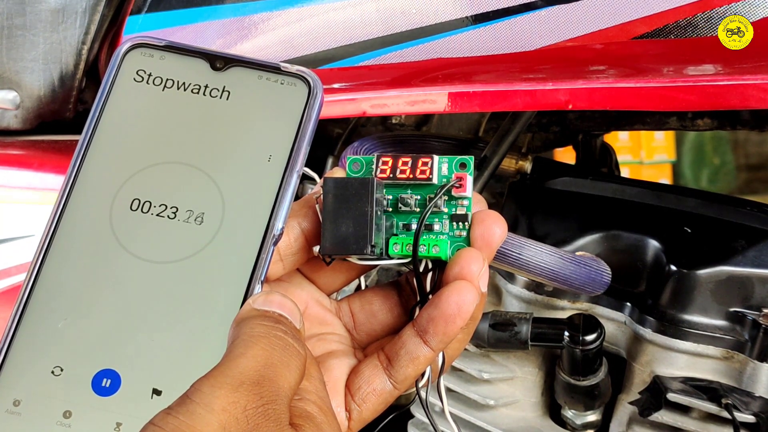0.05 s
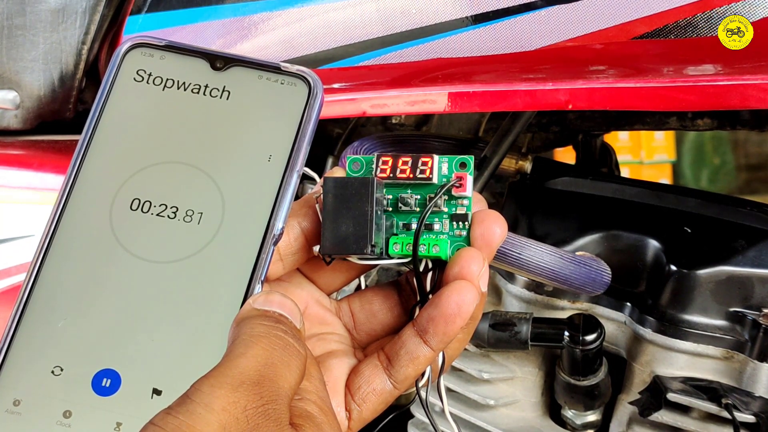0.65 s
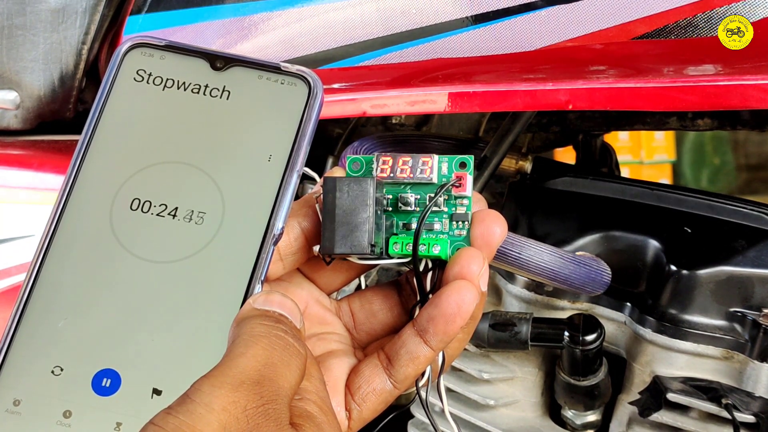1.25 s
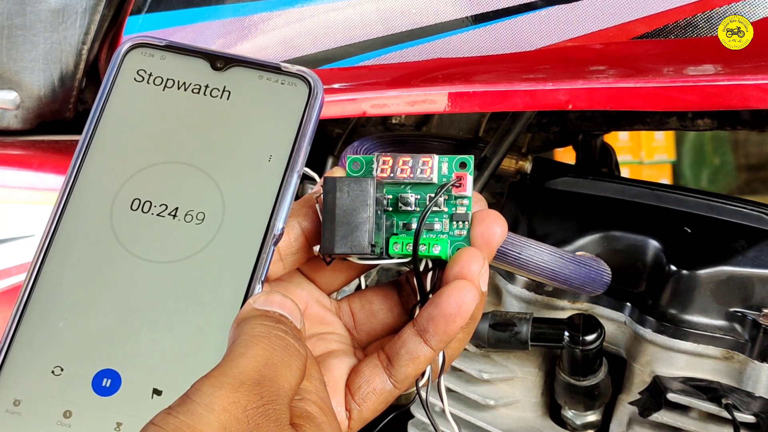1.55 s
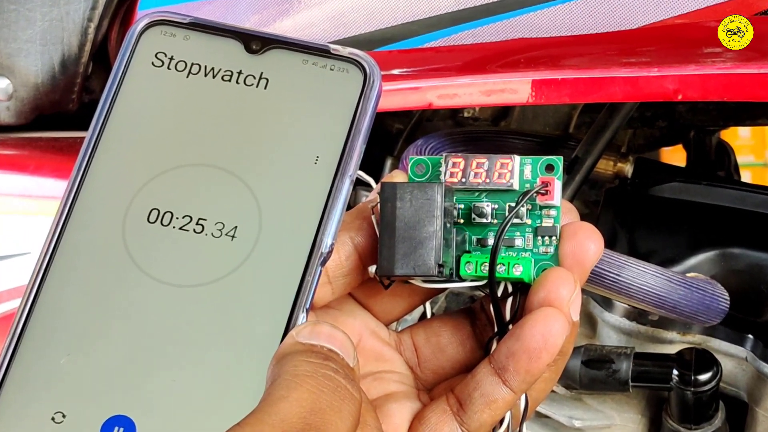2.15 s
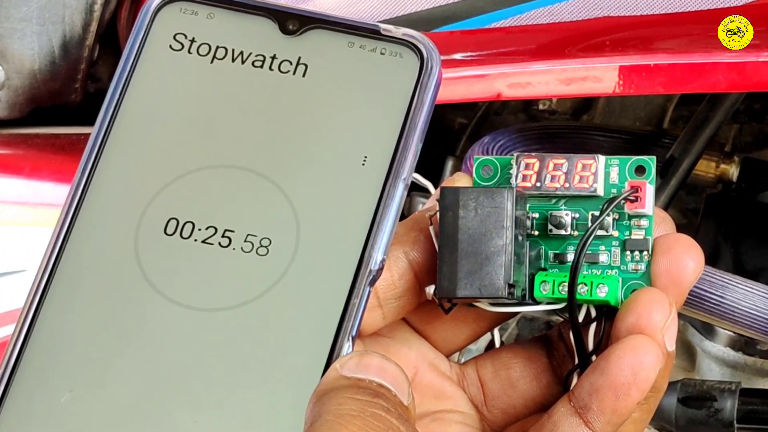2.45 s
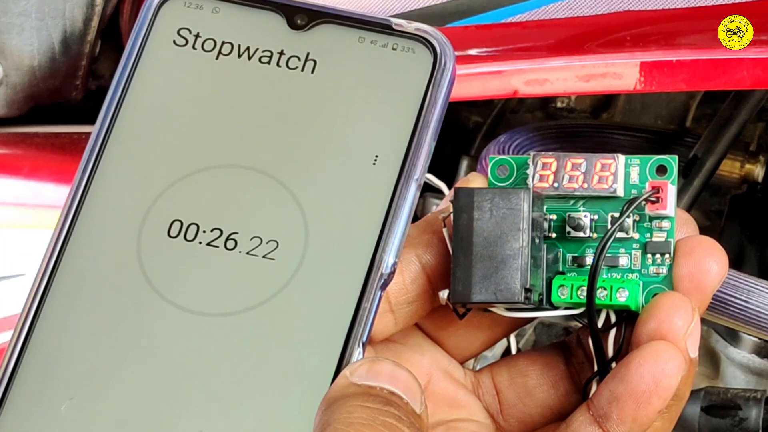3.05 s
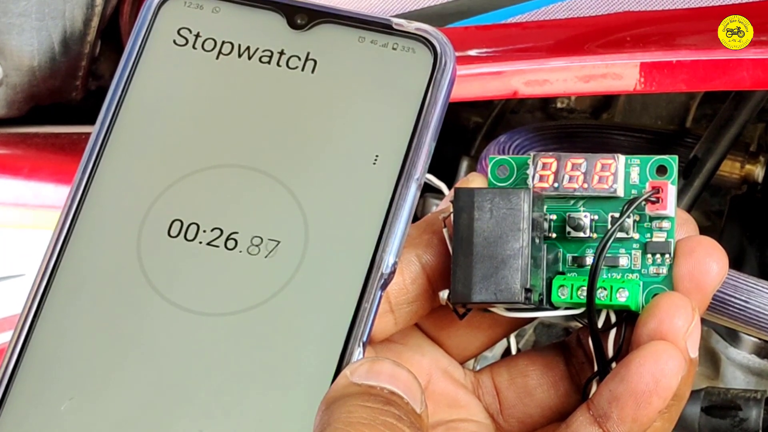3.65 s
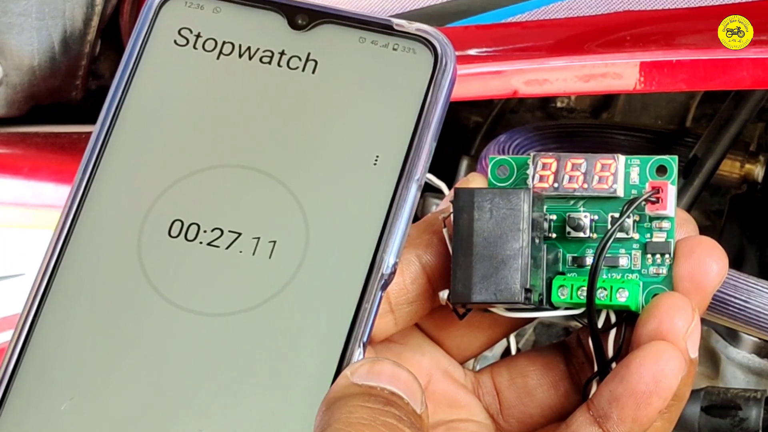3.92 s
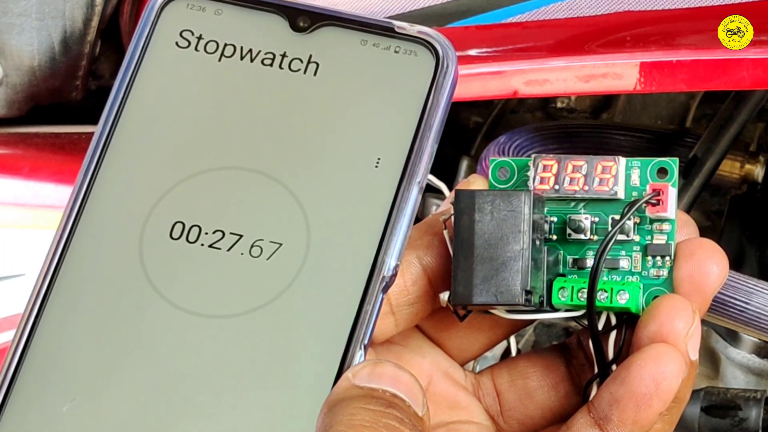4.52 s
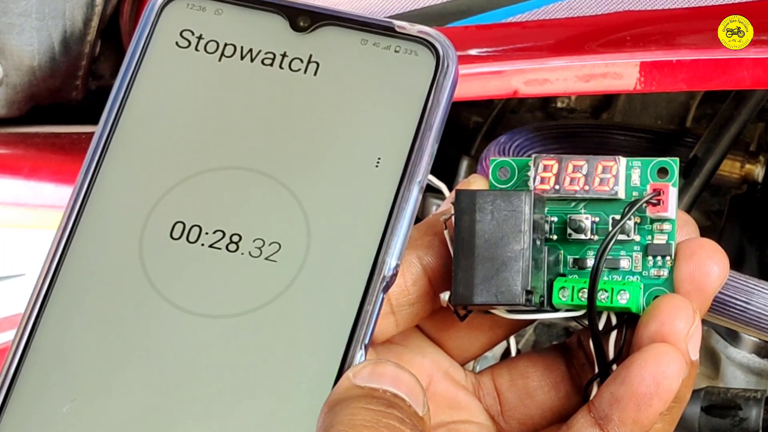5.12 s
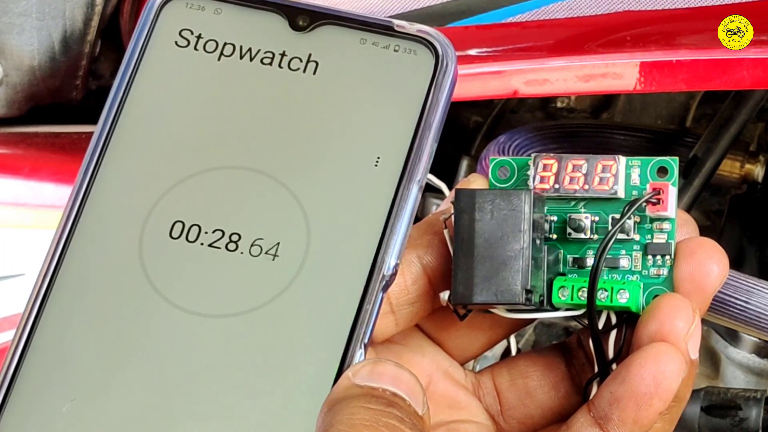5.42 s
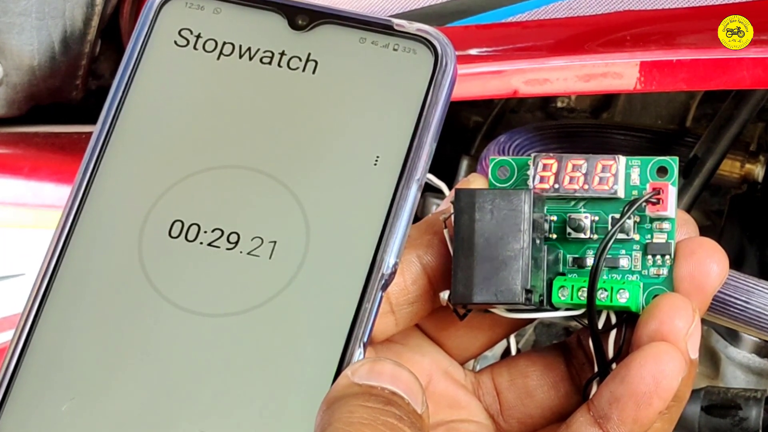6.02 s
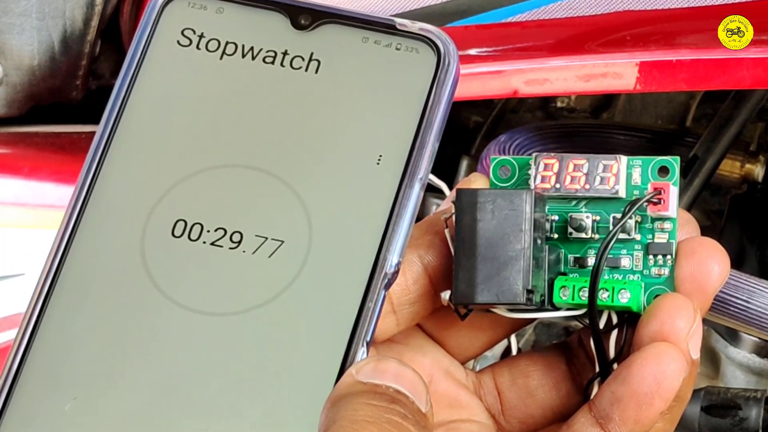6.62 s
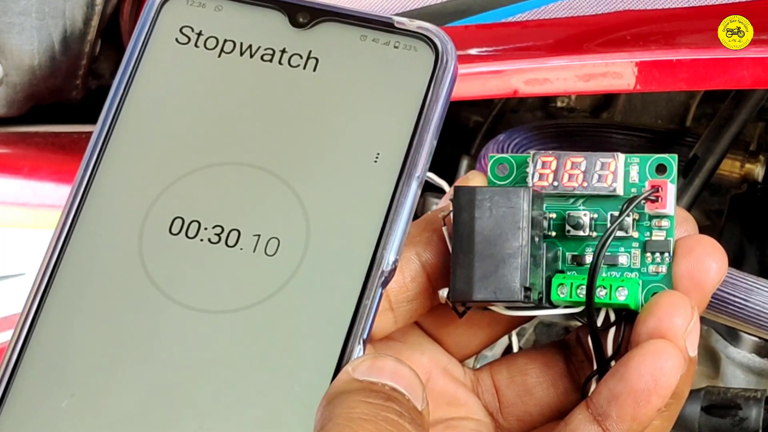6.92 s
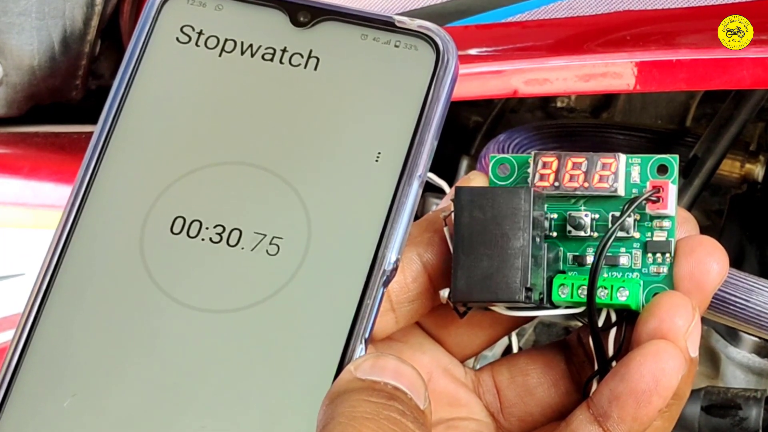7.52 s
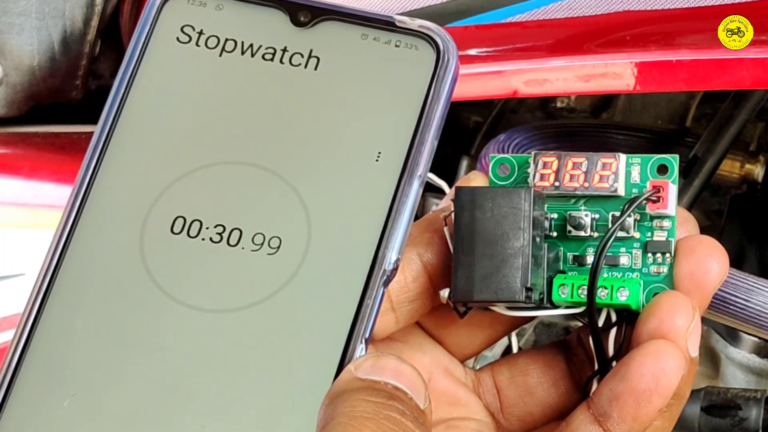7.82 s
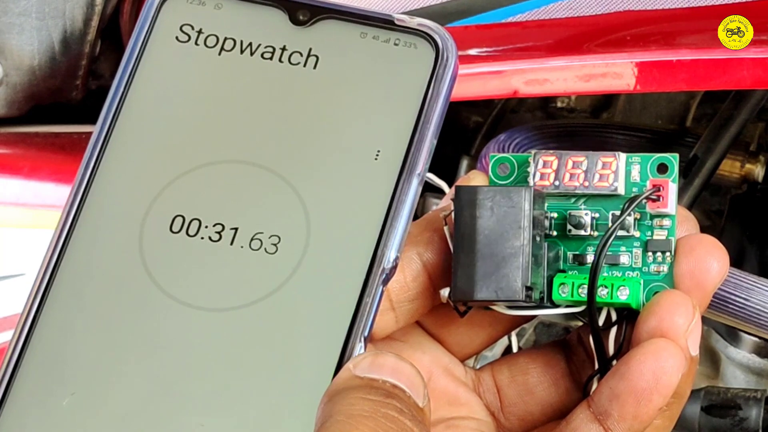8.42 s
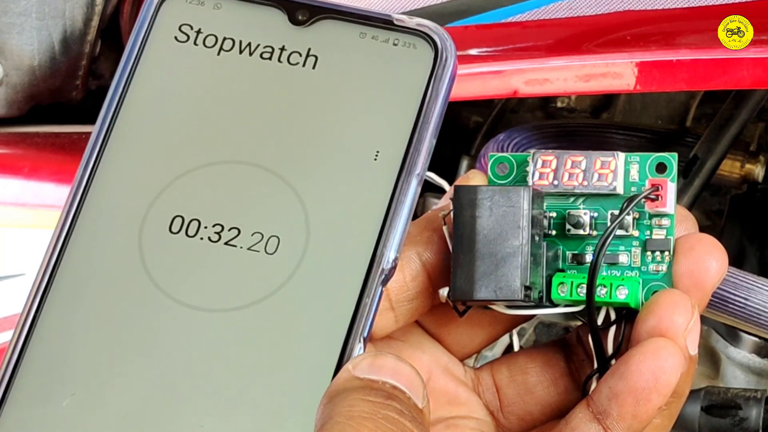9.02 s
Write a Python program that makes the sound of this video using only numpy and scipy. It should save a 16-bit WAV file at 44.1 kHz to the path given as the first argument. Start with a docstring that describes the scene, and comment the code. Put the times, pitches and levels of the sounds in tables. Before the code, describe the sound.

Heard close up in a workshop, a single-cylinder motorcycle engine putters at idle throughout, its speed wandering a little. Valves tick and clink, the metal casing knocks, and chain and gears whirr underneath. In the first three seconds a soft hollow hoot repeats over a faint hum, then both die away. Brief dry rasps crop up irregularly, and the ticking grows slightly stronger near the end.

```python
"""In a workshop, a small air-cooled four-stroke engine idles, heard from beside its one cylinder.
In each cycle, gas thumps out through the pipe, air is gulped in, knocks ring the metal casing and the
valve parts tick, over the whirr of chain and gears. The speed wanders a little, and the thumps are
harder when it is faster. Some cycles add a short dry rasp.
Early on, a soft hollow hoot comes and goes over a faint hum."""
import sys
import numpy as np
from scipy import signal
from scipy.fft import rfft, irfft
from scipy.io import wavfile

SR = 44100
rng = np.random.default_rng(int(sys.argv[2]) if len(sys.argv) > 2 else 0)


def put_to_file(sound):
    """Save the sound as 16-bit audio at rate SR, in the file named by the first command-line argument."""
    columns = np.atleast_2d(sound).T  # one column per channel
    safe = np.clip(columns, -1, 1)
    whole_steps = np.round(safe * 32767)
    wavfile.write(sys.argv[1], SR, whole_steps.astype(np.int16))


N = 408366
TIME = np.arange(N) / SR
HOOT_HZ = 315.8   # pitch of both the hoots and the hum


def exhaust(cycle, burn_db, exhaust_at=-.052, intake_at=.567, valve_hz=350):
    """A push of gas going out and a pull of air coming in make the pipe and silencer ring."""
    # tones of the pipe and silencer: f/Hz, width/Hz, level/dB
    pipe_modes = [(73.7, 25.2, -17.5), (108.4, 13.8, -18.5), (155.4, 80.6, -2), (156.8, 116.8, 0.5)]
    # bark as the exhaust opens, then thud of the silencer shell: place/cycles, f/Hz, width/Hz
    bark_modes = [(.002, 232, 48), (.1, 391, 50)]
    # strength of that bark and that thud: level/dB
    bark_levels = [-24.5, -27]
    push = strikes(cycle, [(exhaust_at, 0)], scatter_db=.37, jitter_s=.0001)
    pull = strikes(cycle, [(intake_at, -6)], scatter_db=.3, jitter_s=.0007)
    # the valves open gradually, which rounds each pulse
    flow = signal.sosfilt(signal.butter(2, valve_hz, fs=SR, output="sos"), push - pull)
    flow *= from_db(burn_db + 3.5)
    pipe = sum((-1) ** k * from_db(db) * ring(flow, hz, width)
               for k, (hz, width, db) in enumerate(pipe_modes))
    barks = sum(ring(strikes(cycle, [(place, db)], scatter_db=1.3, jitter_s=.0001), hz, width)
                for (place, hz, width), db in zip(bark_modes, bark_levels))
    # the small outlet gives off no deep bass
    return signal.sosfilt(signal.butter(4, 62, "high", fs=SR, output="sos"), pipe + barks)


def casing(cycle):
    """Knocks ring the metal casing and loose parts rattle after them; it gives off no deep bass."""
    # piston and cam knocks: place/cycles, level/dB
    contacts = [(-.152, 2), (-.09, -7), (-.054, -.4), (.034, -.2), (.145, -3.7), (.233, -3.8), (.296, -4.4),
                (.361, -8.3), (.459, -4.3), (.599, -8)]
    # tones of the casing: f/Hz, width/Hz, level/dB
    modes = [(220, 97, 1), (292, 9.1, -5), (392.8, 12.3, 9), (426.8, 7.7, 8.5), (511.5, 5, -1),
             (657.4, 10.4, 7.5), (695, 9.7, 5.5), (770, 24, 3), (835, 21, 2.5), (1009, 104, -6.5),
             (1041, 11.5, -3.6), (1233, 43, -7), (1386, 47, -8)]
    knocks = strikes(cycle, contacts, scatter_db=1.35, jitter_s=.00008)
    rattle = chatter(knocks, decay_s=.0039)
    metal = from_db(-33) * (body(knocks, modes) + .31 * body(rattle, modes))
    return signal.sosfilt(signal.butter(2, 60, "high", fs=SR, output="sos"), metal)


def tappets(cycle):
    """Tappets, the small parts that push the valves open, tap and set the valve cover ringing."""
    # the taps: place/cycles, level/dB
    taps = [(-.006, 0), (.036, -4), (.16, -5.5), (.2, -9), (.32, -13)]
    # tones of the cover: f/Hz, width/Hz, level/dB
    modes = [(2375, 65, -1.5), (2437, 89, 4), (2800, 63, 3), (3520, 220, -11), (5490, 100, -8.5)]
    # slow drift of the clatter: t/s, level/dB
    drift = [(0, 0.5), (3.7, 1), (4.4, 1.5), (5.9, 2), (6.9, 4.5), (8.1, 3.5), (8.7, 2), (9.26, 3)]
    # cycles where the tappets land hard: t/s, extra level/dB
    hard_taps = [(.9, 1.5), (1.8, 2.5), (2.1, 2), (3.15, 6.5), (5.27, 5), (6.85, 2.5), (7.6, 2), (8.0, 2)]
    clatter_db = in_time(drift) + each_cycle(cycle, spread_db=1.5)
    for s, extra_db in hard_taps:
        clatter_db[np.round(cycle) == np.round(np.interp(s, TIME, cycle))] += extra_db
    # no two taps land alike, so each tone gets strikes of its own
    cover = sum(from_db(db) * width * ring(strikes(cycle, taps, scatter_db=3, jitter_s=.00022), hz, width)
                for hz, width, db in modes)
    return from_db(clatter_db - 52.5) * cover / cover.std()


def clinks(cycle):
    """Steel meets steel, ringing the valve springs and the rockers (the levers that work the valves)."""
    # the steel contacts: place/cycles, level/dB
    contacts = [(-.02, 0), (.002, -1), (.026, -1.5), (.052, -4), (.165, -8), (.21, -10), (.26, -8),
                (.593, -8), (.745, -11)]
    # tones of the springs and rockers: f/Hz, width/Hz, level/dB
    modes = [(6150, 71, -9), (6650, 71, -3), (6995, 57, 2.5), (7330, 99, 1), (7380, 170, -3),
             (8110, 340, -13.5), (9970, 1000, -21), (11150, 49, -11), (12000, 200, -29)]
    clicks = strikes(cycle, contacts, scatter_db=.5, jitter_s=.000098)
    return from_db(-53.5) * body(chatter(clicks, decay_s=.0033), modes)


def bright_ticks(cycle, facing_db):
    """The valve parts also tick very high, loudest about a third of a cycle after the main tap."""
    # the ticks: place/cycles, level/dB
    contacts = [(.155, -5), (.2, -6), (.255, -4), (.287, 1), (.335, -7), (.53, -9), (.675, -9)]
    # tones they ring with: f/Hz, width/Hz, level/dB
    modes = [(9100, 200, -4), (9560, 130, 3), (11100, 70, -1.5), (11900, 120, -3.5), (13380, 70, -5.5),
             (14250, 220, -6)]
    clicks = strikes(cycle, contacts, scatter_db=2.2, jitter_s=.0004)
    ticks = body(chatter(clicks, decay_s=.002), modes)
    return from_db(facing_db + each_cycle(cycle, spread_db=1.6) - 65.5) * ticks


def rasp(cycle, speed, start_at=.76, rise_s=.0035, decay_s=.025):
    """A dry scrape comes just before the tappets, faint on most cycles and loud on a few."""
    # the loud rasps: t/s, level/dB
    loud_rasps = [(0.41, -47), (0.75, -44), (2.19, -43), (2.73, -45), (3.13, -45), (3.54, -46), (3.95, -47),
                  (5.8, -45), (5.87, -47), (6.63, -45), (7.44, -49), (7.58, -44), (8.39, -44)]
    # tone colour of the scrape: f/Hz, level/dB
    colour = [(1500, -27), (2500, -1), (3600, 10.5), (5500, 9), (7000, -1), (9000, -28), (15000, -42)]
    rasp_cycle = cycle - start_at
    db = each_cycle(rasp_cycle - .5, spread_db=1) - 54
    for s, loud_db in loud_rasps:
        db[np.floor(rasp_cycle) == np.round(np.interp(s, TIME, rasp_cycle))] = loud_db
    age = rasp_cycle % 1 / speed
    rise = np.minimum(age / rise_s, 1)
    fade = np.exp(-np.maximum(age - 2 * rise_s, 0) / decay_s)
    return from_db(db) * rise * fade * noise(colour)


def whirr(cycle):
    """Chain and gears run on, louder and softer as the load changes through each cycle."""
    # tone colour of chain, gears and cooling fins: f/Hz, level/dB
    colour = [(25, -35), (60, 3), (130, 3), (300, 5.5), (550, 0.5), (800, 2), (1300, -7), (1900, -14.5),
              (3000, -16.5), (5600, -22), (7100, -19), (8600, -30.5), (12000, -36.5), (15500, -38)]
    # swell with the load: place/cycles, level/dB
    load = [(0, 4), (.3, 6.5), (.5, 5.5), (.7, 3), (.85, 7.5)]
    place, db = np.transpose(load)
    return from_db(np.interp(cycle, place, db, period=1) - 37.5) * noise(colour)


def hoots(length_s=.15, sag_hz_per_s=50):
    """Soft, nearly pure notes swell and fade, each sinking a little in pitch."""
    # the middle of each hoot: t/s, level/dB
    notes = [(1.199, -37), (1.924, -32.5), (2.162, -28), (2.353, -28.5), (2.575, -33), (2.809, -36)]
    out = np.zeros(N)
    for s, db in notes:
        near = np.abs(TIME - s) < length_s / 2
        offset_s = TIME[near] - s
        swell = np.cos(np.pi * offset_s / length_s)
        tone = np.sin(2 * np.pi * (HOOT_HZ - sag_hz_per_s * offset_s / 2) * offset_s)
        out[near] += from_db(db) * np.sqrt(2) * swell * tone
    return out


def hum(width_hz=43):
    """A faint hum wavers at the pitch of the hoots and all but dies away after them."""
    # loudness of the hum: t/s, level/dB
    levels = [(0, -45), (.6, -41), (1.6, -37.5), (2.6, -39), (3.6, -56), (9.26, -56)]
    x = ring(ring(rng.standard_normal(N), HOOT_HZ, width_hz), HOOT_HZ, width_hz)
    return from_db(in_time(levels)) * x / x.std()


def workshop(x, echo_s=.2, echo_db=-13):
    """Adds short, dense echoes from tank, floor and walls; they fade by 60 dB in echo_s."""
    age = TIME[:SR // 2]
    echoes = rng.standard_normal(len(age)) * from_db(-60 * age / echo_s) * (age > .003)
    return x + from_db(echo_db) * signal.fftconvolve(x, echoes / np.linalg.norm(echoes))[:N]


def strikes(cycle, contacts, scatter_db, jitter_s):
    """One click per contact in every cycle, uneven in force and, as the parts are loose, in timing."""
    out, cycle_numbers = np.zeros(N), np.arange(-1, cycle[-1] + 1)
    for place, db in contacts:
        force, late = rng.standard_normal((2, len(cycle_numbers)))
        due_s = np.interp(cycle_numbers + place, cycle, TIME, left=-1, right=-1)
        at = np.round((due_s + jitter_s * late) * SR).astype(int)
        heard = (at >= 0) & (at < N)
        out[at[heard]] += from_db(db + scatter_db * force[heard])
    return out


def chatter(clicks, decay_s):
    """Each click breaks up into a quickly dying spray of tiny ones."""
    energy = signal.lfilter([1], [1, -np.exp(-2 / (decay_s * SR))], clicks ** 2 + 1e-18)
    return np.sqrt(energy) * rng.standard_normal(N)


def ring(drive, hz, width_hz):
    """One ringing tone (a mode): a click starts it, and the wider it is, the sooner it dies."""
    r, w = np.exp(-np.pi * width_hz / SR), 2 * np.pi * hz / SR
    return signal.lfilter([0, np.sin(w)], [1, -2 * r * np.cos(w), r * r], drive + 1e-18)


def body(drive, modes):
    """An object rings with several tones at once, every other one flipped; scaled to strength 1."""
    x = sum((-1) ** k * from_db(db) * width * ring(drive, hz, width)
            for k, (hz, width, db) in enumerate(modes))
    return x / x.std()


def noise(colour):
    """Noise with the given tone colour, scaled to strength 1."""
    hz, db = np.transpose(colour)
    bins_hz = np.maximum(np.fft.rfftfreq(N, 1 / SR), 1)
    gain = from_db(np.interp(np.log(bins_hz), np.log(hz), db))
    x = irfft(rfft(rng.standard_normal(N)) * gain, N)
    return x / x.std()


def each_cycle(cycle, spread_db):
    """A new random level for every cycle, changing halfway between whole counts."""
    return spread_db * rng.standard_normal(int(cycle[-1]) + 4)[np.round(cycle).astype(int) + 2]


def in_time(rows):
    """Joins (time, value) points with straight lines, giving a value for every sample."""
    return np.interp(TIME, *np.transpose(rows))


def from_db(db):
    """Turns decibels into a factor to multiply by."""
    return 10 ** (np.asarray(db) / 20)


def scene(idle_speed=14.7, burn_db_per_speed=2.5):
    """The turning crankshaft times every part of the engine; a stronger fuel burn drives it faster."""
    # engine speed: t/s, cycle rate/Hz
    speeds = [(0.0, 14.594), (0.49, 15.25), (0.99, 14.25), (1.16, 14.696), (1.42, 13.986), (1.81, 15.271),
              (1.95, 14.502), (2.18, 14.914), (4.02, 14.571), (4.33, 15.019), (4.83, 14.401),
              (5.32, 14.642), (5.55, 14.373), (6.23, 14.327), (6.58, 15.039), (7.02, 14.401), (7.53, 15.14),
              (7.92, 14.561), (8.75, 14.841), (8.85, 14.415), (9.26, 14.529)]
    # how squarely the listener faces the engine: t/s, level/dB
    facing = [(0, 4.5), (1, 3), (2, 3.5), (3, -0.5), (4.3, 0), (5.5, -0.5), (6.5, -2.5), (8, -5), (9.2, -1)]
    speed, facing_db = in_time(speeds), in_time(facing)
    cycle = np.cumsum(speed) / SR - .434   # counts cycles; a "place" is an offset from a whole count
    burn_db = burn_db_per_speed * (speed - idle_speed) + each_cycle(cycle, spread_db=.5)
    knocks = casing(cycle) * from_db(.068 * burn_db + .19 * facing_db)
    gears = whirr(cycle) * from_db(.54 * burn_db + .1 * facing_db)
    cylinder_head = tappets(cycle) + clinks(cycle) + bright_ticks(cycle, facing_db) + rasp(cycle, speed)
    return (exhaust(cycle, burn_db) + knocks + gears + workshop(cylinder_head) + hoots() + hum())[None]


def record(dry, cutoff_hz=15500):
    """Cuts off the very highest treble steeply."""
    return signal.sosfilt(signal.ellip(12, .1, 80, cutoff_hz, fs=SR, output="sos"), dry)


dry = scene()
out = record(dry)
put_to_file(out)
```